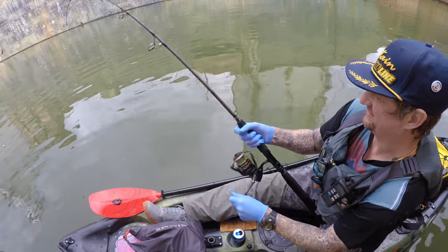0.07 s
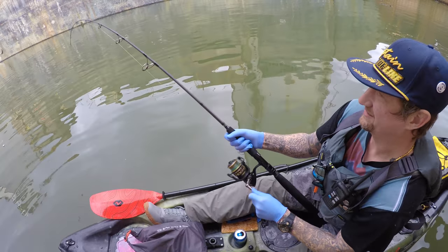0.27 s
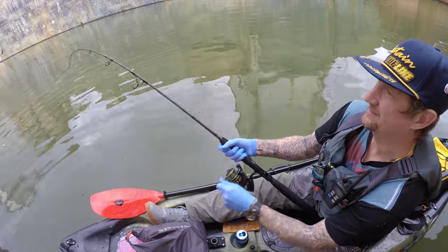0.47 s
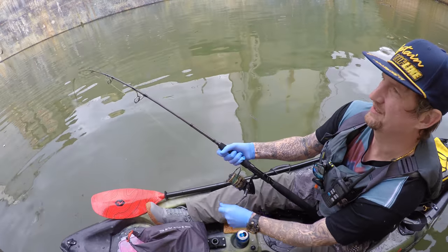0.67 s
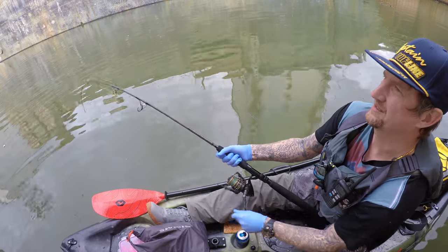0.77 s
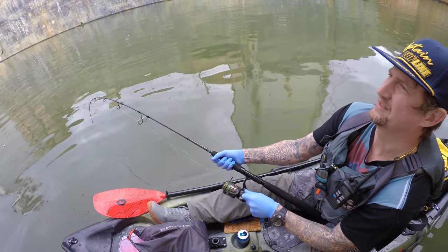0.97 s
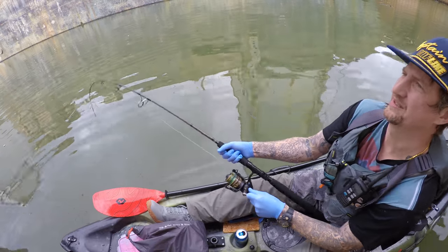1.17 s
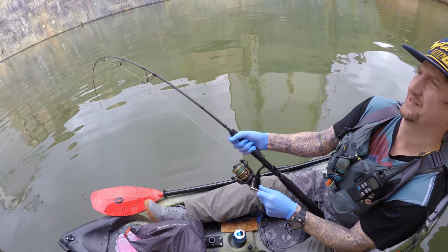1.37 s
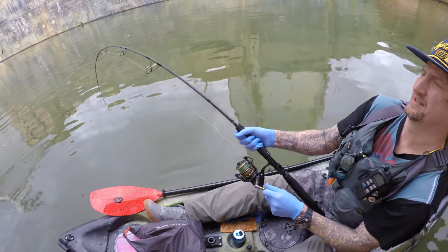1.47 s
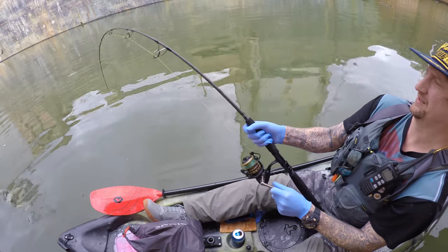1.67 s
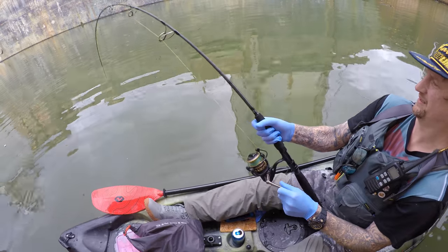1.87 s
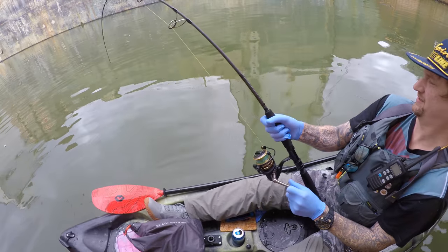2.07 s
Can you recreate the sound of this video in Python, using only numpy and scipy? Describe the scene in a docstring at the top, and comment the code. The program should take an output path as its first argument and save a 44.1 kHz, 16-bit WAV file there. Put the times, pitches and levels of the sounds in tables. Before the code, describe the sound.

A spinning reel rattles and clicks on a kayak, with one dull hull knock over calm water

```python
"""Kayak on calm water

On board, by a small camera with two microphone ports: the reel's handle rubs, squeaks and ticks, and the rod
butt knocks the plastic hull. The drag clicker clicks twice, then starts to buzz as line slips.
A dull throb, perhaps a far engine, beats about ten times a second under the outdoor hush.
Blows ring decaying sines over snaps of noise, rub and hush are shaped noise, throbs are short pulses."""
import sys
import numpy as np
from scipy import signal
from scipy.fft import rfft, irfft, next_fast_len
from scipy.io import wavfile
from scipy.ndimage import uniform_filter1d, map_coordinates

SR = 44100
rng = np.random.default_rng(int(sys.argv[2]) if len(sys.argv) > 2 else 0)


def generate_wav(signal):
    """Clip the signal to [-1, 1] and save it as 16-bit WAV at the path in sys.argv[1]."""
    frames = np.transpose(np.atleast_2d(signal))
    scaled = np.clip(frames, -1, 1) * 32767
    pcm = np.round(scaled).astype(np.int16)
    wavfile.write(sys.argv[1], SR, pcm)


N = 94815


def amp(db):
    """Decibels as an amplitude factor."""
    return 10 ** (np.asarray(db) / 20)


def unit(x):
    """x scaled to an RMS of one."""
    return x / np.sqrt(np.mean(x ** 2) + 1e-20)


def along(points, hz):
    """Value at hz between (Hz, value) points, on a log frequency axis."""
    f, v = np.transpose(points)
    return np.interp(np.log(hz + 1), np.log(f + 1), v)


def curves(rows):
    """One value per sample for each column after the time."""
    s, *columns = np.transpose(rows)
    return [np.interp(np.arange(N) / SR, s, c, right=c[-1]) for c in columns]


def wobble(rate):
    """A smooth random curve with rate knots a second."""
    knots = rng.standard_normal(int(N * rate / SR) + 4)
    return map_coordinates(knots, [np.arange(N) * rate / SR])


def filtered(x, response):
    """x times a response of frequency, with padding against wrap-around."""
    m = next_fast_len(N + SR // 2)
    return irfft(rfft(x, m) * response(np.fft.rfftfreq(m, 1 / SR)), m)[..., :N]


RING_SAMPLES = SR // 4


def add(out, s, db, modes, tilt_db=0, pivot_hz=1000, rise=.001, lag_s=0, scatter_db=4.5,
        waver_hz=0, flutter_db=0, hold=0):
    """One blow rings the modes, their phases wandering; the right port hears it lag_s later."""
    hz, level, t60, pan = np.transpose(modes)[:, :, None]
    level = db + level + tilt_db * np.log2(hz / pivot_hz) + scatter_db * rng.standard_normal(hz.shape)
    clock = np.arange(RING_SAMPLES) / SR
    steps = rng.standard_normal((len(hz), RING_SAMPLES))
    drift = np.cumsum(steps, 1) * np.sqrt(2 * np.pi * waver_hz / SR)
    drift = uniform_filter1d(uniform_filter1d(drift, size=20, axis=1), size=20, axis=1)
    if flutter_db:
        # The flutter sets in over the first 8.5 ms.
        level = level + flutter_db * wobble(128.4)[:RING_SAMPLES] * np.minimum(clock / 0.0085, 1)
    taper = np.cos(np.linspace(0, np.pi / 2, RING_SAMPLES)) ** .5
    for port, side in enumerate((1, -1)):
        t = np.maximum(clock - port * lag_s, 0)
        decay_db = 60 * np.maximum(t - hold, 0) / t60
        ring = amp(level + side * pan / 2 - decay_db) * np.sin(2 * np.pi * hz * t + drift)
        onset = (1 - np.exp(-t / rise)) ** 2
        out[port, round(s * SR):][:len(t)] += ring.sum(0) * onset * taper


CRACK_T60_S = .03


def cracks(contacts, low_hz, high_hz):
    """A short band of noise at each (s, dB) contact, drawn separately for the two ports."""
    out, t = np.zeros((2, N + SR)), np.arange(SR // 20) / SR
    for s, db in contacts:
        envelope = amp(db - 60 * t / CRACK_T60_S) * (1 - np.exp(-t / 0.00083))
        out[:, round(s * SR):][:, :len(t)] += envelope * rng.standard_normal((2, len(t)))

    def band(hz):
        return 1 / np.sqrt((1 + (low_hz / (hz + 1)) ** 24) * (1 + (hz / high_hz) ** 30))
    return filtered(out[:, :N], band)


# Colour of the far bed. Each row: frequency in Hz, relative level in dB.
HUSH_COLOUR = [(15, -65), (25, -20), (86, -4.5), (140, -0.5), (240, 2.5), (281, -1), (368, -4),
               (1380, -19.5), (2230, -26.5), (2850, -30), (4260, -38), (4620, -37), (12500, -51),
               (15500, -62.5)]
# Its slow swells. Each row: time in seconds, then level in dB of the low, the middle and the high part.
HUSH_LEVEL = [(0.0, -64.5, -82, -80.5), (0.14, -64, -72, -78.5), (0.29, -61, -75.5, -76),
              (0.59, -61.5, -75, -77), (0.75, -64.5, -71.5, -75), (0.94, -65.5, -83.5, -83),
              (1.2, -64, -86, -84), (1.35, -65, -80, -78.5), (1.47, -66.5, -74.5, -81.5),
              (1.68, -66.5, -82, -82.5), (1.9, -68, -77, -83), (2.15, -65.5, -77, -85)]
# How alike the two ports hear it. Each row: frequency in Hz, left-right likeness (1 is mono).
PORT_LIKENESS = [(60, 0.28), (180, 1), (550, -0.14), (1650, -0.35), (4970, 0.056), (15000, -0.2)]
# Narrow tones in the hush. Each row: frequency in Hz, half-width in Hz, level in dB.
HUSH_TONES = [(80.6, 6.3, -73), (472, 6.1, -81), (687, 30.5, -82)]
LOW_SPLIT_HZ, HIGH_SPLIT_HZ = 1660, 5200
LOW_SWAY_DB, MIDDLE_SWAY_DB = 2.1, 1.2


def hush():
    """Far traffic, air and water: patchy noise, most alike at both ports in the bass, with narrow tones."""
    z = signal.stft(rng.standard_normal((2, N)), nperseg=512)[2]
    patches = uniform_filter1d(uniform_filter1d(rng.standard_normal(z.shape[1:]), 6, 0), 10, 1)
    pair = signal.istft(z * amp(2.44 * unit(patches)), nperseg=512)[1][:, :N]

    def mid_and_side(hz):
        turn = np.arccos(np.clip(along(PORT_LIKENESS, hz), -1, 1)) / 2
        return amp(along(HUSH_COLOUR, hz)) * [np.cos(turn), np.sin(turn)]
    mid, side = filtered(pair, mid_and_side)
    both = np.array([mid + side, mid - side])
    low = filtered(both, lambda hz: 1 / (1 + (hz / LOW_SPLIT_HZ) ** 4))
    high = filtered(both, lambda hz: 1 - 1 / (1 + (hz / HIGH_SPLIT_HZ) ** 4))
    middle = both - low - high
    low_db, middle_db, high_db = curves(HUSH_LEVEL)
    bed = unit(low) * amp(low_db + LOW_SWAY_DB * wobble(9.6))
    bed += unit(middle) * amp(middle_db + MIDDLE_SWAY_DB * wobble(11.58))
    bed += unit(high) * amp(high_db)
    for hz, width, db in HUSH_TONES:
        tone = filtered(rng.standard_normal(N), lambda f: 1 / (1 + ((f - hz) / width) ** 2))
        bed += amp(db) * unit(tone)
    return bed


# Resonances of the reel body, also rung by the ticks.
# Each row: frequency in Hz, relative level in dB, time to fall 60 dB in seconds, left minus right in dB.
REEL_BODY = [(1452, -6, 0.04, -12.5), (1550, -19, 0.097, 14), (1786.5, 2.5, 0.027, -8),
             (1867, -0.5, 0.019, -6), (2210, -14.5, 0.018, 14.5), (2570, -15.5, 0.019, -4),
             (2910, -20.5, 0.043, -12.5), (3192, -12, 0.02, -18.5), (3880, -16, 0.01, -13),
             (4160, -11.5, 0.0088, 6), (5750, -22.5, 0.017, 16.5), (7050, -6.5, 0.0056, 0),
             (8250, -21.5, 0.013, -14)]
# The handle rubbing. Each row: time in seconds, relative level in dB, brightness in dB per octave.
RUBBING = [(0.0, -86, 16.5), (0.152, -76, 11), (0.298, -60.5, -9.5), (0.61, -78, 3), (0.918, -81.5, 13),
           (1.05, -96, 10)]
RUB_SWAY_DB = 2.5


def rub():
    """The handle's grainy friction: noise of uneven strength through the reel body's resonances."""
    out = np.zeros((2, N))
    level_db, tilt_db = curves(RUBBING)
    fade = np.clip((RUBBING[-1][0] - np.arange(N) / SR) / .1, 0, 1)
    for hz, db, t60, pan in REEL_BODY[:10]:
        width = 6 / t60
        grit = rng.standard_normal((2, N)) * amp(4.3 * wobble(81.2))
        shared = grit + 0.37 * grit[0]  # some of the left grit reaches both ports
        band = unit(filtered(shared, lambda f: (1j * f * width / (hz * hz - f * f + 1j * f * width)) ** 2))
        band_db = level_db - 5 + db + tilt_db * np.log2(hz / 1800) + RUB_SWAY_DB * wobble(15.36)
        out += band * fade * amp(band_db + [[pan / 2], [-pan / 2]])
    return out


# Thin flickering squeaks. Each row: start in seconds, level in dB, frequency in Hz, rise in seconds,
# hold in seconds, time to fall 60 dB in seconds, left minus right in dB.
SQUEAKS = [(0.066, -71.5, 4210, 0.013, 0.11, 0.45, -2), (.116, -50.5, 1875, 0.0016, 0.01, 0.022, 11.5),
           (0.1376, -45.5, 1836, 0.00098, 0.0057, 0.026, 13),
           (0.1557, -45, 1742, 0.00031, 0.0025, 0.018, -16), (0.322, -64.5, 3900, 0.002, 0.08, 0.16, -7),
           (0.342, -50, 4233, 0.00086, 0.0043, 0.27, -0.5), (0.352, -60.5, 2890, 0.0058, 0.0092, 0.14, -10),
           (0.432, -55.5, 1850, 0.0012, 0.039, 0.035, -17), (0.569, -66.5, 1849, 0.0035, 0.17, 0.03, -9.5),
           (0.565, -71.5, 3860, 0.002, 0.015, 1, -8), (0.596, -63, 668, 0.015, 0.037, 0.19, -5),
           (.669, -53.5, 3140, 0.0006, 0.00076, 0.026, -18.5), (.672, -67.5, 4940, 0.0027, 0.043, .1, 11.5),
           (0.747, -71.5, 4960, 0.0044, 0.022, 0.044, 19), (0.749, -48, 845, 0.017, 0.0085, 0.071, 3),
           (0.785, -71, 4324, 0.0041, 0.059, 0.035, 1), (0.888, -76.5, 3396, 0.011, 0.026, 0.19, -13),
           (1.9502, -57.5, 6380, 0.00062, 0.00094, 0.018, 21)]
SQUEAK_WAVER_HZ, SQUEAK_FLUTTER_DB = 32, 3.5


def squeaks():
    """Each squeak of the handle is one tone, unsteady in phase and level, that holds and then dies."""
    out = np.zeros((2, N + SR))
    for s, db, hz, rise, hold, t60, pan in SQUEAKS:
        add(out, s, db, [(hz, 0, t60, pan)], rise=rise, lag_s=.0003, waver_hz=SQUEAK_WAVER_HZ,
            scatter_db=.5, flutter_db=SQUEAK_FLUTTER_DB, hold=hold)
    return out[:, :N]


# Handle ticks. Each row: start in seconds, level in dB, brightness in dB per octave, rise in seconds.
HANDLE_TICKS = [(0.1549, -66, 6.5, 0.00047), (0.2143, -31, 0.5, 0.001), (0.2899, -31.5, 0, 0.00094),
                (0.3943, -28, -6.5, 0.0018), (0.567, -46.5, 6, 0.0026)]
TICK_CRACK_DB, TICK_LOW_HZ, TICK_HIGH_HZ = -9.5, 1870, 4170  # the snap under the ringing


def ticks():
    """Each tick of the handle rings the reel body over a short snap of noise."""
    out, contacts = np.zeros((2, N + SR)), []
    for s, db, tilt, rise in HANDLE_TICKS:
        add(out, s, db, REEL_BODY, tilt, pivot_hz=1840, rise=rise, lag_s=0.00044, scatter_db=2.5, waver_hz=5.5)
        contacts.append((s, db + tilt + TICK_CRACK_DB))  # brighter ticks snap harder
    return out[:, :N] + cracks(contacts, TICK_LOW_HZ, TICK_HIGH_HZ)


# How hull and water answer. Each row: frequency in Hz, time to fall 60 dB in seconds.
ANSWER_DECAY = [(1000, 0.13), (4000, 0.12), (7000, 0.099), (12000, 0.085)]


def echo(x):
    """Hull and water answer with a noise tail in which each frequency dies at its own speed."""
    hz, t, z = signal.stft(rng.standard_normal((2, SR // 3)), SR, nperseg=256)
    fading = z * amp(-60 * t / along(ANSWER_DECAY, hz)[:, None])
    tail = signal.istft(fading, SR, nperseg=256)[1]
    return signal.fftconvolve(x, tail / np.linalg.norm(tail[0]), axes=1)[:, :N]


# Dull throbs, most on the steady beat. Each row: trough in seconds, level in dB, frequency in Hz.
THROBS = [(0.17, -47, 92), (0.275, -36, 133), (.292, -45, 127), (0.299, -40, 128), (0.432, -51.5, 76),
          (0.48, -56, 85.5), (0.583, -47, 100), (0.677, -41.5, 68.3), (0.687, -43, 110), (0.79, -59.5, 102),
          (0.89, -51, 76), (0.994, -50, 94), (1.103, -54.5, 115), (1.199, -51, 84), (1.302, -49, 105),
          (1.401, -45.5, 194), (1.503, -48.5, 81), (1.603, -55.5, 97), (1.708, -57, 100.5),
          (1.811, -51, 80.5), (1.913, -49, 99), (1.971, -55, 287), (2.071, -60, 168), (2.118, -48.5, 98)]
RISE_CYCLES, FALL_CYCLES, THROB_PAN_DB = 0.26, 0.8, -4  # pan is left minus right


def throb():
    """Each beat is a trough between two crests that dies within a few cycles."""
    s, db, hz = np.transpose(THROBS)[:, :, None]
    cycles = (np.arange(N) / SR - s) * hz
    rise = np.exp(-(cycles / RISE_CYCLES) ** 2)
    fall = np.exp(-np.abs(cycles) / FALL_CYCLES)
    pulses = -amp(db) * np.where(cycles < 0, rise, fall) * np.cos(2 * np.pi * cycles)
    return pulses.sum(0) * amp([[THROB_PAN_DB / 2], [-THROB_PAN_DB / 2]])


# The rod butt's knock and its bounce. Each row: start in seconds, force in dB, brightness in dB per octave.
BUTT_KNOCKS = [(.22296, -5.7, -.4), (.23572, -12.5, .7)]
# Resonances of the plastic hull.
# Each row: frequency in Hz, relative level in dB, time to fall 60 dB in seconds, left minus right in dB.
HULL_MODES = [(78, -36, .15, 0), (115.4, 0, .019, 0), (153.3, -25.9, .121, 1), (189.4, -5.5, .047, 1),
              (279.8, -17.3, .093, 1), (354.8, -5.5, .018, 1), (465, -34, .07, 0), (590, -27, .025, 0)]


def hull():
    """A soft knock and its bounce push the hull inward and ring its low modes."""
    out = np.zeros((2, N + SR))
    for s, db, tilt in BUTT_KNOCKS:
        add(out, s, db, HULL_MODES, tilt, pivot_hz=200, rise=.004, scatter_db=.2)
    return -out[:, :N]  # inward: the first swing is negative


# Drag clicks. Each row: start in seconds, level in dB, brightness in dB per octave, rebound delay in seconds.
DRAG_CLICKS = [(0.7051, -37, 4, .002), (1.6163, -32, 0, 0.0035), (2.1308, -51, 3, .002),
               (2.1358, -52, 2, 0.0018), (2.1398, -51.5, 3, 0.002), (2.1452, -56, 3, 0.002)]
# Resonances of the spool and its clicker.
# Each row: frequency in Hz, relative level in dB, time to fall 60 dB in seconds, left minus right in dB.
SPOOL_MODES = [(1690, -27.5, 0.044, -7.5), (2910, -20, 0.02, -11), (3430, -16, 0.0098, -24.5),
               (3990, -1.5, 0.015, -6.5), (4265, -8, 0.016, 2), (4418, -30, 0.18, 6),
               (5230, -16, 0.0093, 14), (6305, -4.5, 0.009, 17), (6600, -25, 0.14, -6),
               (6666, 10.5, 0.011, 2.5), (7450, -3.5, 0.0099, -3), (8020, -15, 0.019, -12),
               (9100, -12, 0.013, 7), (10360, -12, 0.012, -17.5), (12600, -33, 0.0098, -8),
               (13600, -25, 0.015, -1)]
TOUCH_LEAD_S, TOUCH_DB, REBOUND_DB = 0.0011, -16, -1  # levels relative to the snap
CRACK_DB, CRACK_LOW_HZ, CRACK_HIGH_HZ = -10.5, 2780, 10060  # the broad snap under the ringing
SPOOL_WAVER_HZ = 15


def drag():
    """Each tooth of the clicker: a faint touch, the snap and a rebound; every contact cracks and rings."""
    out, contacts = np.zeros((2, N + SR)), []
    for s, db, tilt, rebound in DRAG_CLICKS:
        for late, gain_db in ((-TOUCH_LEAD_S, TOUCH_DB), (0, 0), (rebound, REBOUND_DB)):
            add(out, s + late, db + gain_db, SPOOL_MODES, tilt, pivot_hz=6000, rise=0.00055,
                lag_s=0.000236, waver_hz=SPOOL_WAVER_HZ)
            contacts.append((s + late, db + gain_db + CRACK_DB))
    return out[:, :N] + cracks(contacts, CRACK_LOW_HZ, CRACK_HIGH_HZ)


def scene():
    """The reel and its answer off hull and water, with hush, throb and knocks added."""
    handle = rub() + squeaks() + ticks()
    clicker = drag()
    answer = echo(amp(-13.0) * clicker + amp(-11.0) * handle)
    return hush() + handle + answer + throb() + hull() + clicker


TOP_HZ = 15700


def record(dry):
    """The camera keeps nothing above its band limit."""
    return filtered(dry, lambda hz: hz < TOP_HZ)


dry = scene()
out = record(dry)
generate_wav(out)
```